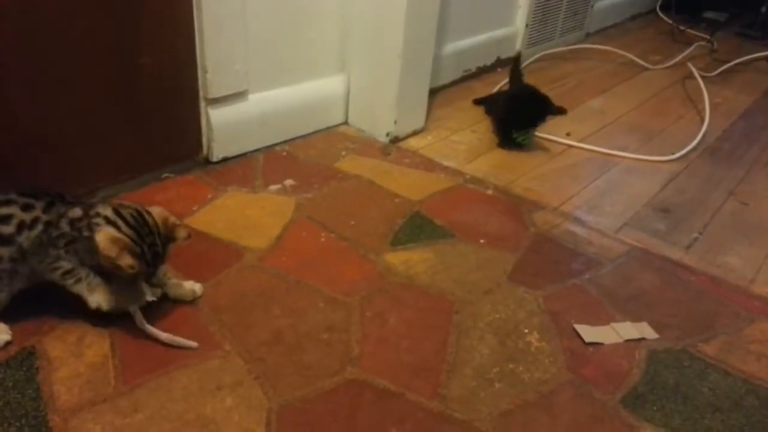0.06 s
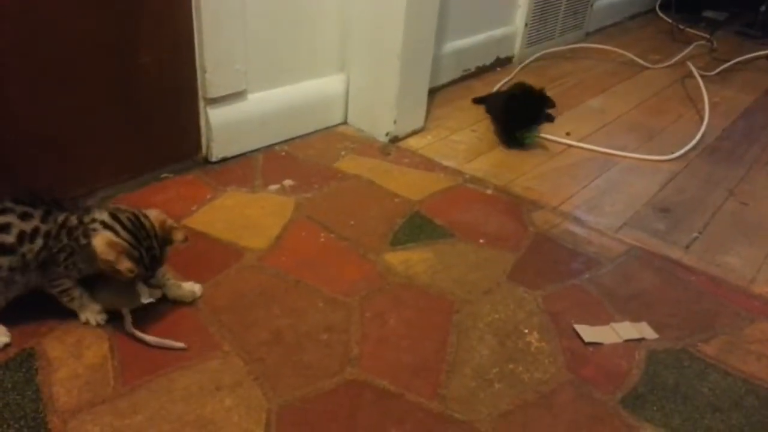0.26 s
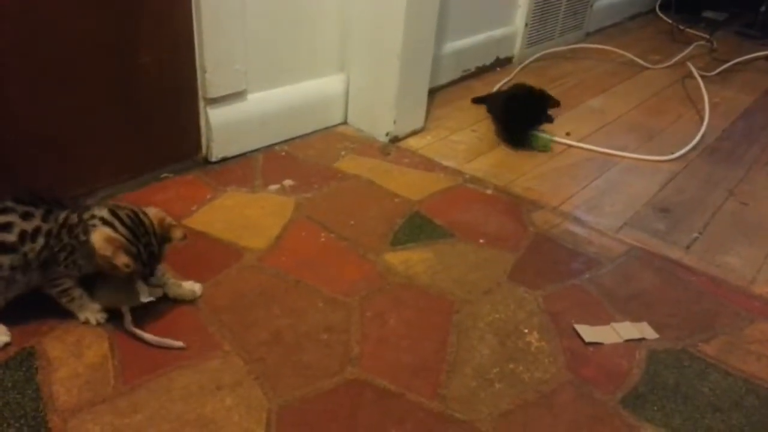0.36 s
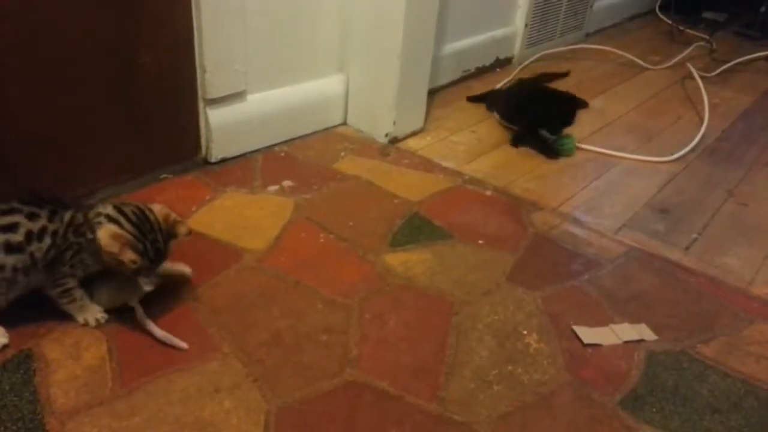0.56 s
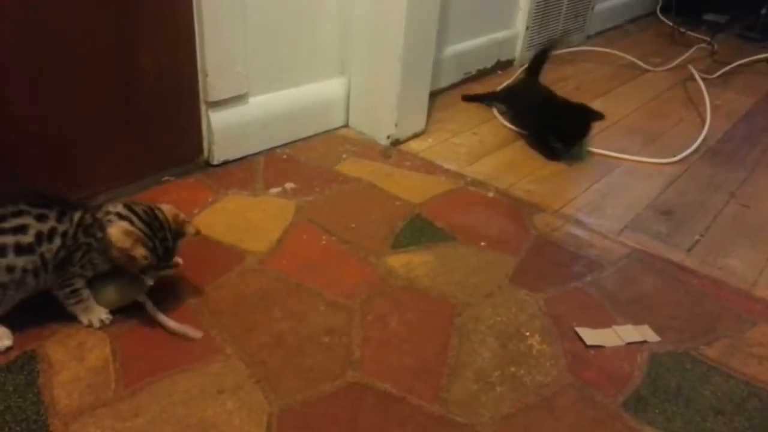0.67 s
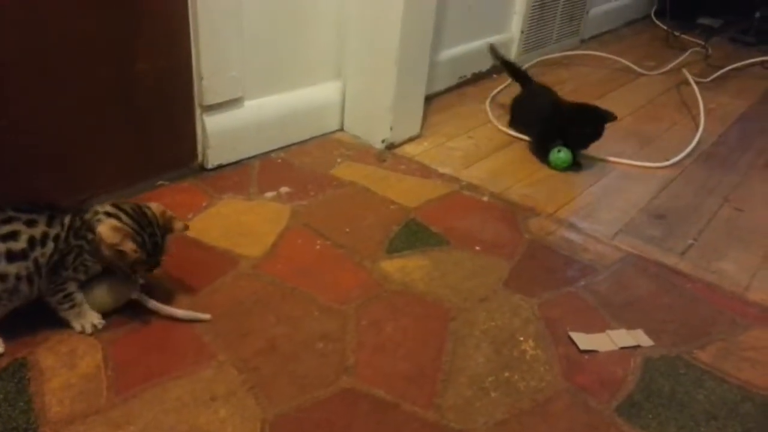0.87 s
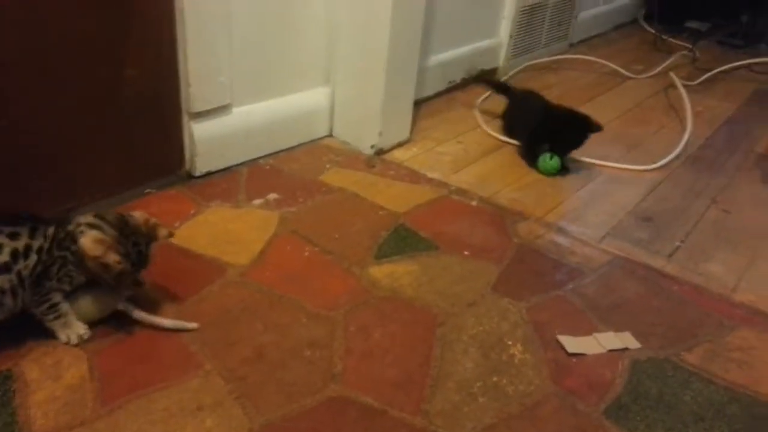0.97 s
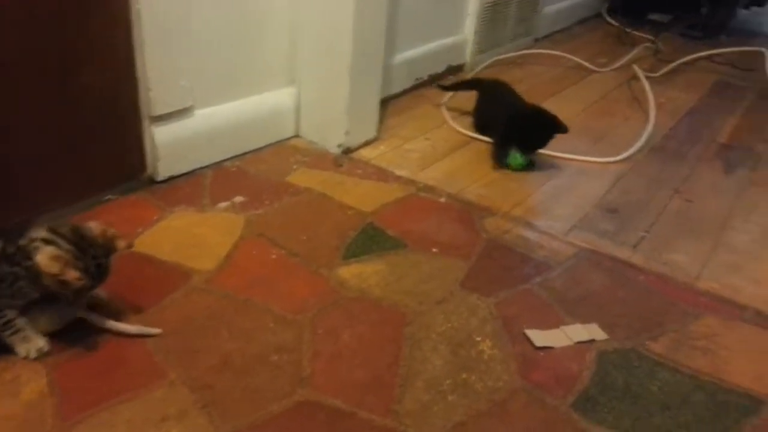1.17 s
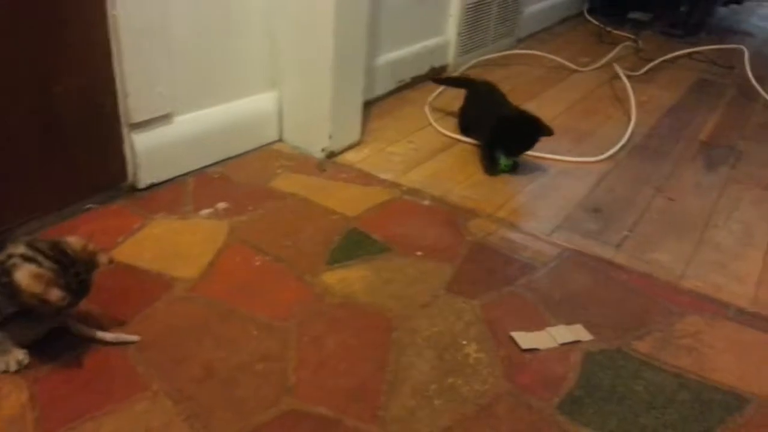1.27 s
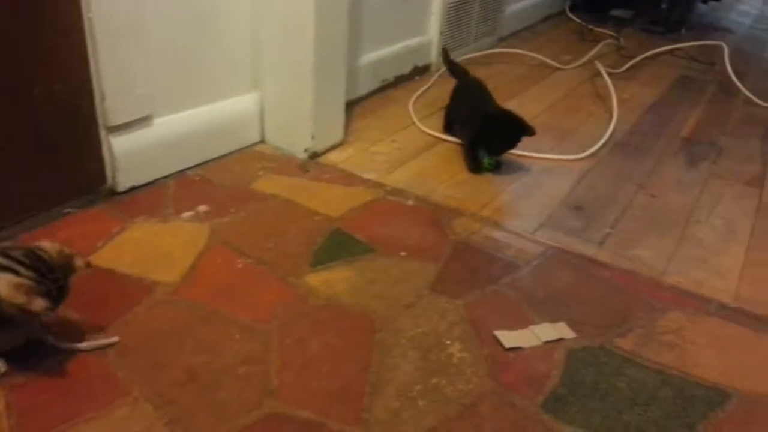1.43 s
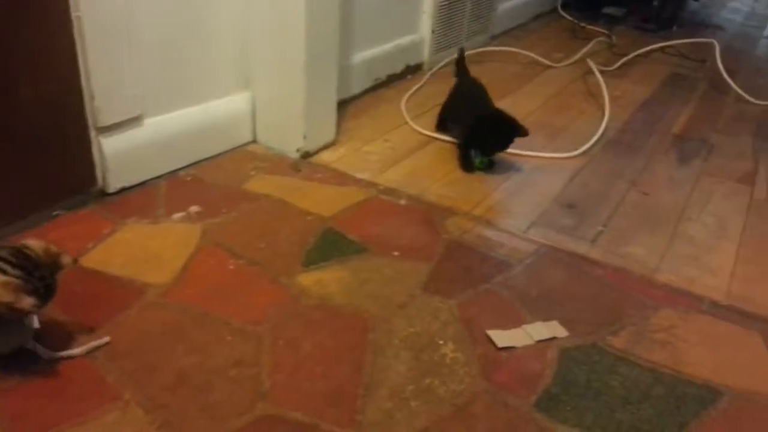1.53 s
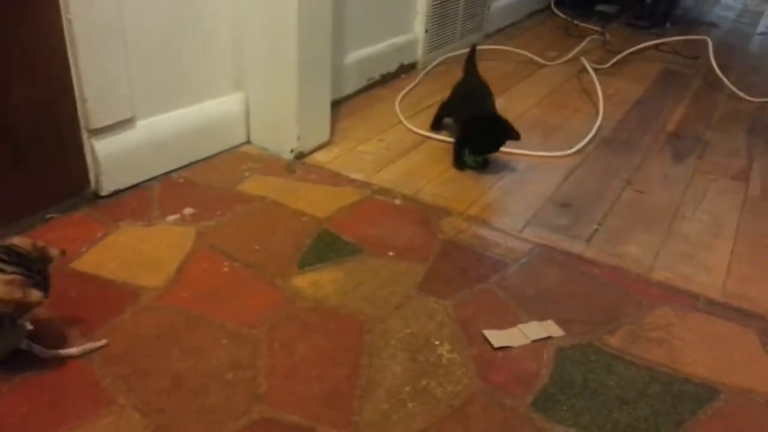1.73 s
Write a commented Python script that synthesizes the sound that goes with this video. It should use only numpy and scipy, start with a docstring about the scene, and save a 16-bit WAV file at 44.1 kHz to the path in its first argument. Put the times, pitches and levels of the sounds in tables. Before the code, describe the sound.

A small plastic ball with a bell inside clacks and rattles over a wooden floor as a kitten bats it. Soft paw thumps join in, then the taps thin out, slightly right in an echoing room with a faint hum.

```python
"""A kitten bats a jingle ball

A small hollow plastic ball clacks over a wooden floor, a little to the right in an echoing room.
A pellet strikes the tiny bell inside, making very high pings, and the ball rattles as it rolls.
Paws thump softly on the boards, and an appliance hums in the background."""
import sys
import numpy as np
from scipy import signal
from scipy.fft import rfft, irfft
from scipy.io import wavfile

SR = 44100
rng = np.random.default_rng(int(sys.argv[2]) if len(sys.argv) > 2 else 0)


def persist_wave(psi):
    """Save psi, clipped to +-1, as 16-bit WAV."""
    counts = np.round(np.clip(psi, -1, 1) * 32767).astype(np.int16)
    wavfile.write(sys.argv[1], SR, np.atleast_2d(counts).T)


N = 79380  # 1.8 seconds
T = np.arange(2048) / SR  # seconds within one short hit

# The appliance's tones. Each row: pitch in Hz, level in dB.
HUM_TONES = [(65.5, -70.5), (111.5, -63.5), (200, -63), (291, -70.5), (423, -72)]
# Spells of rolling. Each row: start in seconds, length in seconds, relative level in dB.
ROLLS = [(0.082, 0.14, -26), (.24, 0.081, -9.5), (0.332, 0.22, -23.5), (0.467, 0.08, -8), (0.588, 0.06, -7),
         (0.695, 0.1, -11.5), (0.862, 0.081, -16), (1.104, 0.11, -21), (1.353, 0.14, -33)]
# The pellet hits the bell. Each row: start in seconds, relative level in dB, upper tones' gain in dB.
PINGS = [(0.115, -32, -4), (.212, -22, -15), (0.2279, -14.5, 15), (0.2503, -13, 10), (0.2727, -6.5, -2),
         (0.3004, -15, -9), (0.3075, -14, 2), (.3635, -26, -6), (0.4777, -10, -18), (0.4908, -4, -9),
         (0.4936, -9, -12), (0.5003, -8.5, -5.5), (0.51, -9, -14.5), (0.5204, -4, -6), (0.589, 5, -10),
         (0.5954, 12, -11), (0.6105, -6, -6), (0.6267, 1.5, -7), (0.647, -7, 1), (0.6707, -7, 2),
         (0.673, 1.5, -4), (0.681, -2.5, -13), (0.7118, -9.5, -16), (0.741, -7, -14), (0.7637, -10, 0),
         (0.782, -8, 0), (0.795, -9, 1), (0.836, -16, -7), (.858, -0.5, -7), (0.8728, -15, -30),
         (0.877, -14, 14), (0.885, -5.5, 4), (.919, -6, -20), (.977, -19, -20), (0.983, -22, -24),
         (1.075, -24.5, -21), (1.097, -34, 11), (1.116, -12.5, -10), (1.1696, -24, 2), (1.183, -15.5, -9),
         (1.195, -21, -10), (1.364, -22, -20), (1.433, -35.5, -7.5)]
# The shell hits the floor. Each row: start in seconds, relative level in dB, hollow ring's gain in dB,
# hollow pitch in Hz, shell ring's gain in dB.
KNOCKS = [(0.2099, -19, 7.5, 2010, -10), (0.2257, -17, 20.5, 2035, -24), (0.2272, -9, 3, 2146, -1),
          (0.2653, -12, 5, 2200, -6), (0.2802, -7.5, -18, 2320, -7), (0.374, -21, -16, 2200, -7),
          (.461, -21, 16.5, 2260, 2), (0.4688, -24, 21, 2570, -8), (.477, -8.5, 17.5, 2334, 2.5),
          (0.488, -13, 2, 2400, 5), (0.4954, -1, 3, 2300, 2), (0.511, -11.5, -12, 2250, 9),
          (0.5838, 4.5, 3.5, 2275, 4), (0.5884, -8, 18.5, 2184, 9), (0.5955, -7, -11, 2090, 11.5),
          (0.606, -12.5, -10.5, 2030, 8.5), (0.6415, -6.5, -14, 2000, -16),
          (0.6524, -11.5, 18.5, 1980, -14), (0.6586, -7.5, 8.5, 2070, 10.5), (0.6743, -3.5, 7.5, 2170, -1),
          (0.7339, -15, -18, 2150, 13.5), (0.74, -3, -19, 2190, 3.5), (0.7507, -17, 0, 2260, -8),
          (.757, -8, -10, 2200, -5), (0.7785, -7.5, -5, 2200, 3), (0.852, -0.5, -4, 2620, -19),
          (0.8721, 0, -17, 2500, 4), (0.8879, -16, 8, 2380, -1), (1.1125, -21, 16, 1710, 2),
          (1.1177, -23.5, 12, 1740, 5.5), (1.364, -25, -7, 2000, -8)]
# Paws and ball thump the boards. Each row: start in seconds, slap's gain in dB,
# added brightness in dB per octave, push's gain in dB.
THUMPS = [(0.2264, 3.5, -2, -14), (0.2295, 5.5, 0.5, -2), (.241, -1, 0.5, -10), (0.266, -6.5, 0, -23),
          (0.48, -3, 2, -13), (.497, 0, 1, -3.5), (0.511, 1, 2, -11.5), (0.586, -4, 3.5, -6),
          (.603, 5, 2, 4.5), (.639, -3.5, 2, -7), (.654, -1, 1.5, -17.5), (.665, -1, 5, -18),
          (0.714, -9, -3, -1.5), (.729, 1.5, 2, -1.5), (.745, -1.5, -7, -2), (.94, 0.5, -1, -5),
          (1.113, -2.5, -6, -4.5), (1.15, -11.5, 2, -14)]

# Ringing tones of bell and shell. Each row: pitch in Hz, relative level in dB, seconds to fade 60 dB.
BELL_TONES = [(11280, -14, .014), (11415, -9, .018), (11560, -3, .027), (11685, 1, .029),
              (11968, -13, .018), (12205, -13, .018), (12380, -12, .022)]
BELL_UPPER_TONES = [(13140, -7, .024), (13245, -4, .028), (13390, -11, .015)]
SHELL_TONES = [(3500, -8, 0.003), (4250, -2, 0.004), (4750, 2, 0.006), (5250, 1.5, 0.006),
               (5950, -3, 0.004), (6900, -5, 0.003)]
# The hollow ring. Each row: multiple of the hollow pitch, relative level in dB, seconds to fade 60 dB.
HOLLOW_TONES = [(.9, -13, 0.0029), (1, -4, 0.011), (1.2, -12, 0.0055)]

# Tone colours: how strong the lows and highs are. Each row: frequency in Hz, gain in dB.
AIR_COLOUR = [(15, -64), (25, -22), (54, -20), (118, -13), (135, -12), (202, -4), (271, -11.5), (363, -11),
              (543, -17), (673, -19), (1000, -18.5), (1090, -21), (6540, -34.5), (13800, -33.5),
              (15000, -30.5)]
TICK_COLOUR = [(300, -52), (3000, -29.5), (7000, -8), (10000, -6), (12000, -0.5), (13500, 4),
               (16000, -24.5)]  # pellet touching bell
CRACK_COLOUR = [(100, -56), (450, -29), (900, -11), (1400, -6), (2300, -0.5), (3100, 4.5), (4800, 4.5),
                (6300, -5), (8000, -5), (10000, 0), (12000, -12.5), (13500, -19), (16000, -75)]  # shell touching floor
BOARD_COLOUR = [(30, -54.5), (100, -8), (170, -1.5), (330, 0.5), (550, -2), (800, -6.5), (1150, 3.5),
                (1800, -19.5), (4000, -37.5)]
TAIL_COLOUR = [(100, 3.5), (1000, -3.5), (4500, -7), (8000, -1.5), (11500, -8.5), (14000, -4)]  # the room's fading wash of echoes
LEFT_DIRECT_COLOUR = [(100, -2), (700, 4), (2200, -9), (4500, -10.5), (8000, 0), (11500, -24), (14000, -6)]  # direct sound, left compared with right
LEFT_ECHO_COLOUR = [(100, -2.5), (700, 3), (2200, -7), (4400, 3), (8000, 0), (10200, -8), (12000, -13),
                    (14000, 0.5)]  # echoes, left compared with right

# How alike left and right sound. Each row: frequency in Hz, likeness from 0 (unrelated) to 1 (same).
AIR_LIKENESS = [(30, .6), (100, 0.37), (300, 0.68), (700, 0.18), (1500, 0.12), (14000, .05)]
TAIL_LIKENESS = [(60, 0.079), (200, 0.9), (450, 0.7), (900, 0), (14000, 0)]
# How long the room rings. Each row: frequency in Hz, seconds to fade 60 dB.
ROOM_FADE = [(100, 0.212), (500, 0.73), (2000, 0.46), (4200, 0.38), (6500, 0.4), (9000, 0.44),
             (14000, 0.27)]
# The first echoes. Each row: delay in seconds, gain in dB.
EARLY_ECHOES = [(.0011, -7), (.0021, -9.5), (.0046, -6), (0.0132, -9.5), (0.018, -14.5), (.0215, -19)]

AIR_DB, HUM_WAVER = -55, 0.3
ROLL_KNOCK_DB, ROLL_KNOCKS_PER_S, ROLL_PING_DB, ROLL_PINGS_PER_S = -20, 500, -26.5, 104
ROLL_HOLLOW_HZ, ROLL_SPREAD_DB = (1720, 2660), 4.5
BELL_DB, TICK_DB, TICK_DECAY_S = -23, -16, 0.0006
PLASTIC_DB, CRACK_DB, CRACK_DECAY_S = -25, -5.5, 0.00083
SLAP_DB, SLAP_DECAY_S, PUSH_DB, PUSH_S = -10, 0.0023, -22.5, 0.00067
TONE_SPREAD_DB, CONTACT_S = 2, 0.00014
TAIL_DB, TAIL_BUILD_S, TAIL_CYCLE_HZ = 1, 0.007, 7
LOWEST_HZ, HIGHEST_HZ = 86, 14150


def amp(db):
    """Turns decibels into a multiplier."""
    return 10 ** (np.asarray(db) / 20)


def unit(x):
    """Scales a sound to an average power of 1."""
    return x / np.sqrt(np.mean(x ** 2) + 1e-20)


def look_up(table, hz):
    """Reads between a table's rows, giving each octave equal room."""
    row_hz, value = np.transpose(table)
    return np.interp(np.log(hz + 1), np.log(row_hz + 1), value)


def add(mix, start, sound):
    """Mixes a sound in at a start time in seconds."""
    part = mix[max(round(start * SR), 0):][:len(sound)]
    part += sound[:len(part)]


def colour(x, table, tilt_db=0, pivot_hz=1000, size=2048):
    """Gives a sound a tone colour, tilted by tilt_db per octave."""
    hz = abs(np.fft.fftfreq(size, 1 / SR))
    log_gain = np.log(amp(look_up(table, hz) + tilt_db * np.log2((hz + 100) / pivot_hz)))
    taps = np.fft.ifft(np.exp(np.conj(signal.hilbert(log_gain)))).real  # never rings ahead of a hit
    return signal.fftconvolve(x, taps[:size // 2])[:len(x)]


def noise_pair(likeness):
    """Left and right hiss, as alike at each frequency as the table says."""
    left, other = rfft(rng.standard_normal((2, N)))
    same = np.clip(look_up(likeness, np.fft.rfftfreq(N, 1 / SR)), -1, 1)
    right = same * left + np.sqrt(1 - same ** 2) * other
    return irfft(np.array([left, right]), N)


def burst(decay_s):
    """A dying puff of noise with an energy of 1."""
    puff = rng.standard_normal(len(T)) * np.exp(-T / decay_s)
    return puff / np.linalg.norm(puff)


def ring(tones, detune):
    """A short contact starts all tones at once; their shares vary, as if each hit found a new spot."""
    hz, db, fade_s = np.transpose(tones)[:, :, None]
    share, shift = rng.standard_normal((2, len(tones), 1))
    height = amp(db + TONE_SPREAD_DB * share)
    height = height * np.linalg.norm(amp(db)) / np.linalg.norm(height)
    fade = np.exp(-np.log(1000) * T / fade_s)
    waves = height * fade * np.sin(2 * np.pi * hz * (1 + detune * shift) * T)
    return waves.sum(0) * (1 - np.exp(-T / CONTACT_S))


def room_air():
    """The faint, steady rush of air in the room."""
    gain = amp(look_up(AIR_COLOUR, np.fft.rfftfreq(N, 1 / SR)))
    return amp(AIR_DB) * unit(irfft(rfft(noise_pair(AIR_LIKENESS)) * gain, N))


def appliance_hum():
    """An appliance hums in low tones that waver in strength and pitch."""
    t = np.arange(N) / SR
    slow_only = np.exp(-np.fft.rfftfreq(N, 1 / SR) / 6)  # keeps wobbles of a few Hz
    hum = np.zeros(N)
    for hz, db in HUM_TONES:
        swell, drift = HUM_WAVER * unit(irfft(rfft(rng.standard_normal((2, N))) * slow_only, N))
        phase = 2 * np.pi * hz * t + drift + 2 * np.pi * rng.random()
        hum += amp(db) * np.sqrt(2) * (1 + swell) * np.sin(phase)
    return hum


def rattle(length_s, per_s, sound):
    """Repeats a small sound at random moments and strengths."""
    t = np.arange(SR // 4) / SR
    hits = (rng.random(len(t)) < per_s / SR) * (t < length_s)
    strength = amp(ROLL_SPREAD_DB * np.minimum(rng.exponential(1, len(t)), 3))
    sign = rng.choice([-1, 1], len(t))
    return signal.fftconvolve(hits * sign * strength, sound)


def rolling(length_s, db, spots=5):
    """A rolling ball makes many tiny knocks on several spots of its shell, and tiny pings inside."""
    out = 0
    for hz in np.linspace(*ROLL_HOLLOW_HZ, spots):
        tiny_knock = shell_knock(db + ROLL_KNOCK_DB, hollow_db=2.5, hollow_hz=hz, shell_db=-9.5)
        out += rattle(length_s, ROLL_KNOCKS_PER_S / spots, tiny_knock)
        tiny_ping = bell_ping(db + ROLL_PING_DB, upper_db=1.5)
        out += rattle(length_s, ROLL_PINGS_PER_S / spots, tiny_ping)
    return out


def bell_ping(db, upper_db, detune=0.0012):
    """The pellet ticks on the bell, which rings briefly in two groups of high tones."""
    metal = ring(BELL_TONES, detune) + amp(upper_db) * ring(BELL_UPPER_TONES, detune)
    tick = colour(burst(TICK_DECAY_S), TICK_COLOUR)
    return amp(db) * (amp(BELL_DB) * metal + amp(TICK_DB) * tick)


def shell_knock(db, hollow_db, hollow_hz, shell_db):
    """The ball lands with a sharp crack, and its hollow plastic shell rings briefly."""
    hollow_tones = [(multiple * hollow_hz, level, fade_s) for multiple, level, fade_s in HOLLOW_TONES]
    shell = amp(shell_db) * ring(SHELL_TONES, detune=0.035)
    hollow = amp(hollow_db) * ring(hollow_tones, detune=0.01)
    crack = colour(burst(CRACK_DECAY_S), CRACK_COLOUR)
    return amp(db) * (amp(PLASTIC_DB) * (shell + hollow) + amp(CRACK_DB) * crack)


def floor_thump(slap_db, tilt_db, push_db):
    """A paw or the ball thumps the boards: a dull slap over the soft push of its weight."""
    slap = colour(burst(SLAP_DECAY_S), BOARD_COLOUR, tilt_db, pivot_hz=400)
    age = T / PUSH_S
    push = age * (2 - age) * np.exp(-age)
    return amp(SLAP_DB + slap_db) * slap + amp(PUSH_DB + push_db) * push / np.linalg.norm(push)


def room_tail(noise):
    """A wash of echoes builds up quickly, then each frequency fades at its own speed."""
    hz, t, bands = signal.stft(noise[:SR], SR, nperseg=256)
    fade = np.exp(-np.log(1000) * t / look_up(ROOM_FADE, hz)[:, None])
    tail = signal.istft(bands * fade, SR, nperseg=256)[1]
    tail *= 1 - np.exp(-(np.arange(len(tail)) / SR / TAIL_BUILD_S) ** 2)
    return amp(TAIL_DB) * colour(tail / np.linalg.norm(tail), TAIL_COLOUR)


def echoes(x):
    """Sound bounces back as early echoes and a tail."""
    paths = [room_tail(noise) for noise in noise_pair(TAIL_LIKENESS)]
    for path in paths:
        for delay, db in EARLY_ECHOES:
            add(path, delay + rng.uniform(0, 0.00044), amp([db]))
    left, right = [signal.fftconvolve(x, path)[:N] for path in paths]
    return np.array([colour(left, LEFT_ECHO_COLOUR), right])


def room(x, tails=3):
    """Direct sound arrives earlier and brighter on the right, followed by the echoes."""
    # Three versions of the room's echo take turns, so repeated hits do not ring at the same pitches.
    turn = TAIL_CYCLE_HZ * np.arange(N) / SR
    shares = np.array([np.maximum(np.cos(2 * np.pi * (turn - k / tails)), 0) for k in range(tails)])
    shares /= np.linalg.norm(shares, axis=0)
    left = colour(np.roll(x, 5), LEFT_DIRECT_COLOUR)  # 5 samples late
    return np.array([left, x]) + sum(echoes(x * share) for share in shares)


def scene():
    """Ball and paws, too light to stir deep bass, sound in the room over the air and the hum."""
    background = room_air() + appliance_hum()
    play = np.zeros(N)
    sources = (KNOCKS, shell_knock), (PINGS, bell_ping), (ROLLS, rolling), (THUMPS, floor_thump)
    for events, make_sound in sources:
        for start, *settings in events:
            add(play, start, make_sound(*settings))
    low_cut = signal.butter(4, LOWEST_HZ, "high", fs=SR, output="sos")
    return background + room(signal.sosfilt(low_cut, play))


def record(dry):
    """Cuts away the very highest treble."""
    high_cut = signal.firwin(101, HIGHEST_HZ, window=("kaiser", 8), fs=SR)
    return signal.oaconvolve(dry, high_cut[None], "same")


dry = scene()
out = record(dry)
persist_wave(out)
```